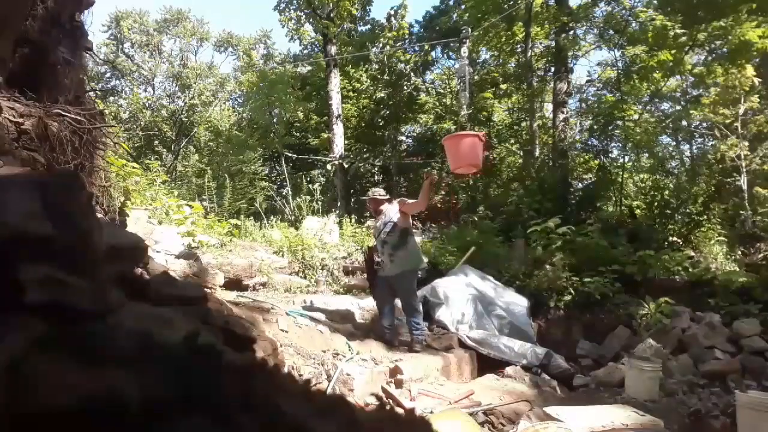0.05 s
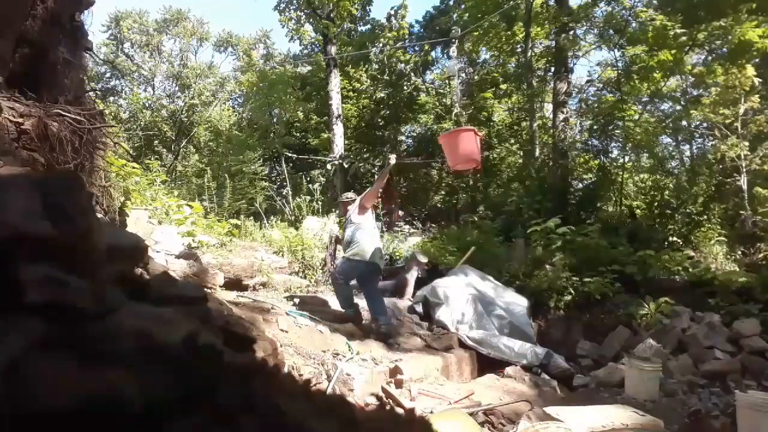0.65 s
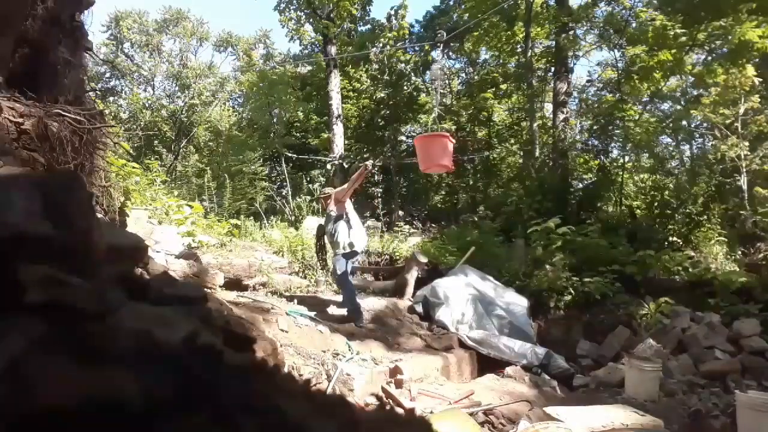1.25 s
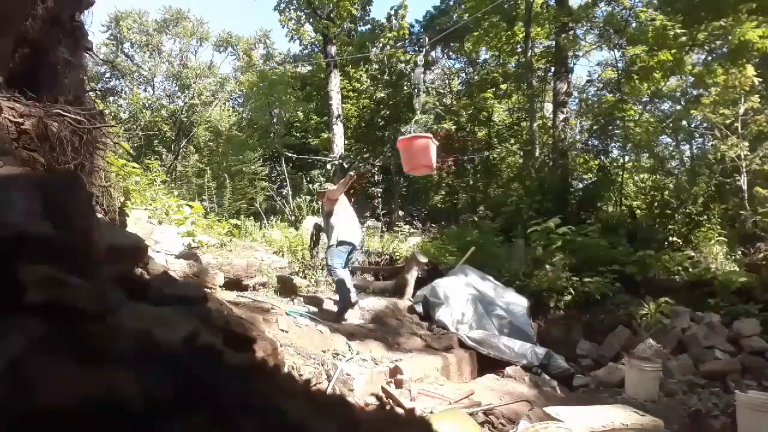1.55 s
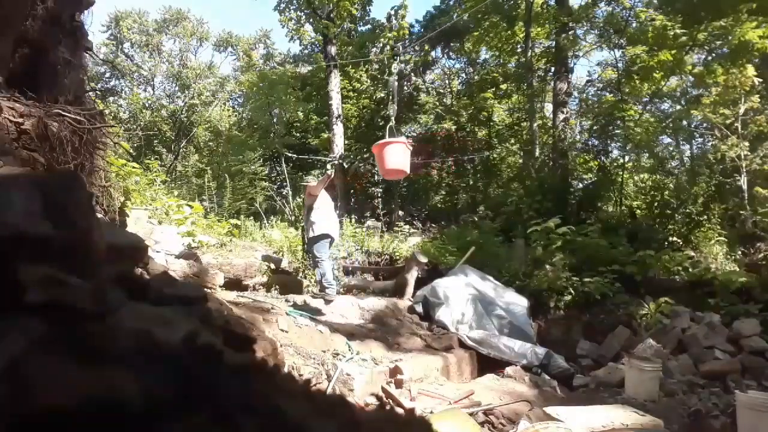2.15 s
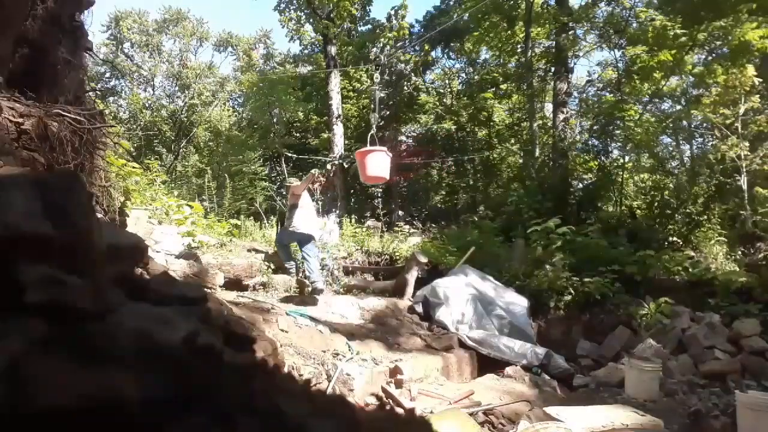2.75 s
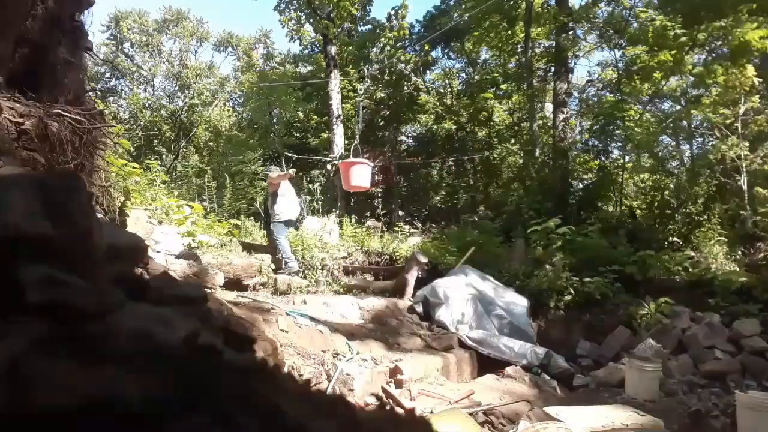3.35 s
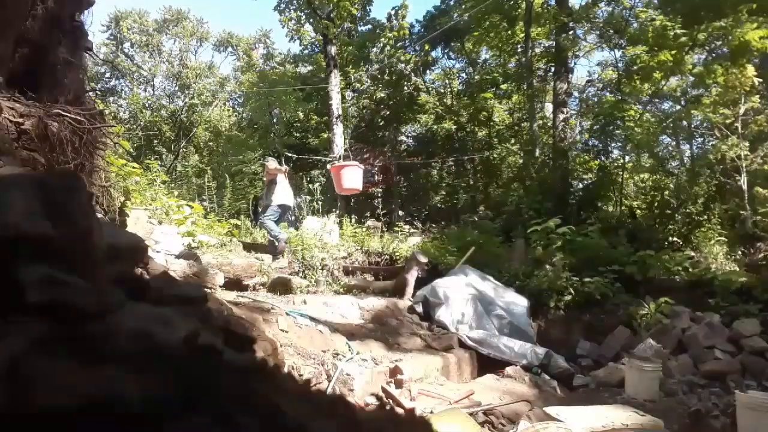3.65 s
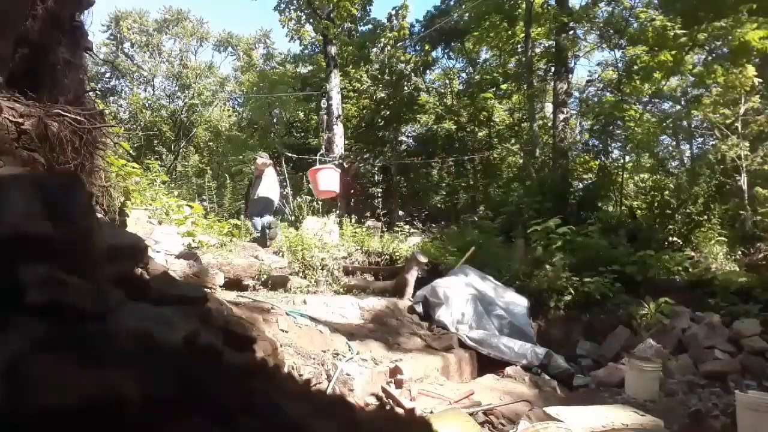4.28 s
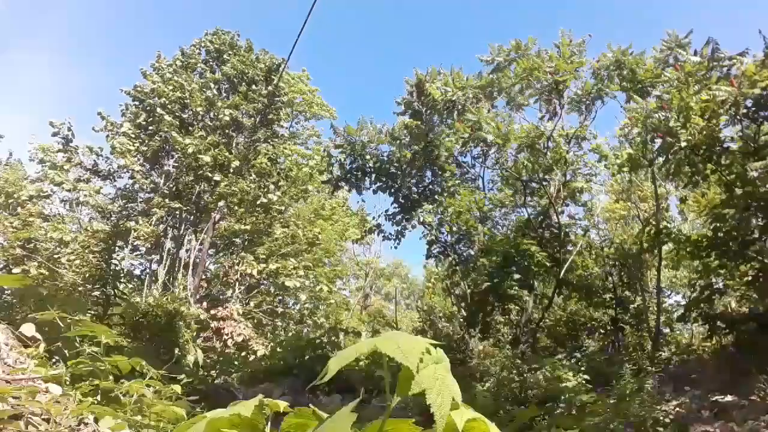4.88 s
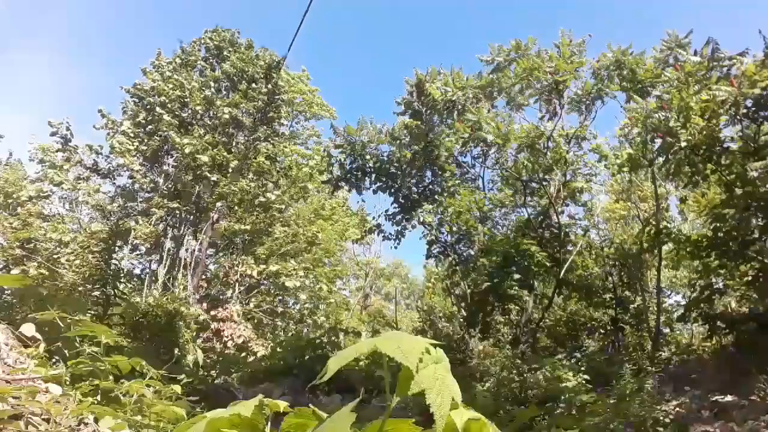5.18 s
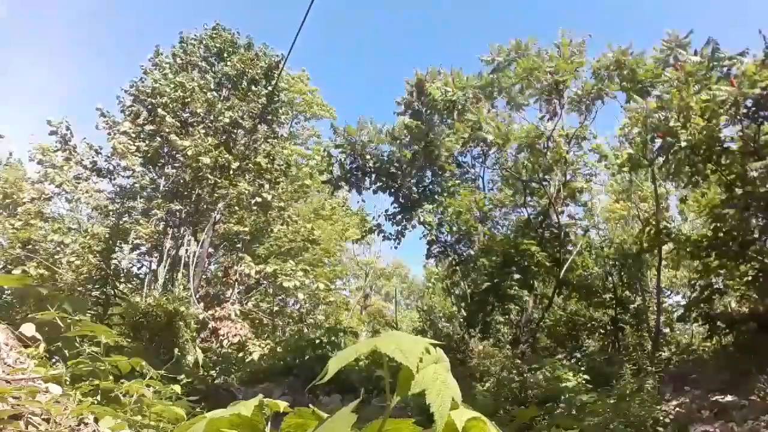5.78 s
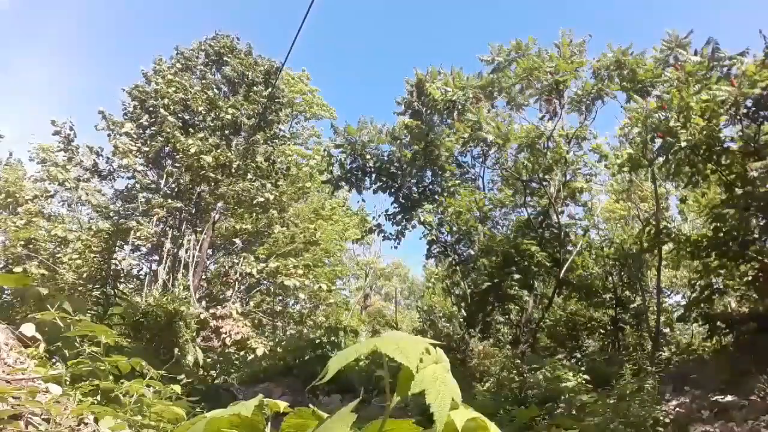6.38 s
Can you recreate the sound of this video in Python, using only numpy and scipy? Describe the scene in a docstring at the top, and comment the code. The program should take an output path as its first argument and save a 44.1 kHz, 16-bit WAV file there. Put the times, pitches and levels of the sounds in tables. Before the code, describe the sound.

In a wooded yard, a chain clinks and jingles unevenly some way off as a hanging bucket is tugged along a line, with soft boot steps on grit and a faint insect buzz. Then, close to the microphone, a pulley squeals briefly and the chain runs through it in one loud rattling rush that rings out. A small bird chirps three times over faint leaf hiss and distant rumble.

```python
"""Hauling a rubble bucket along an overhead line

In a wooded yard each tug shakes the bucket's chain into clinks, as links collide and ring. Boots thud
on loose ground and an insect buzzes faintly. Then, heard from close under the line, the chain bites on
a pulley that squeals by stick-slip friction, runs free in one loud rattling rush and rings out.
A small bird calls in the quiet afterwards, over distant rumble and the hiss of leaves."""
import sys
import numpy as np
from scipy import signal
from scipy.fft import rfft, irfft
from scipy.io import wavfile
from scipy.ndimage import uniform_filter1d

SR = 44100
rng = np.random.default_rng(int(sys.argv[2]) if len(sys.argv) > 2 else 0)


def waveform_to_disk(signal):
    """Save audio, clipped to [-1, 1], as 16-bit WAV at the path in sys.argv[1]."""
    frames = np.transpose(np.atleast_2d(signal))
    scaled = np.clip(frames, -1, 1) * 32767
    samples = np.round(scaled).astype(np.int16)
    wavfile.write(sys.argv[1], SR, samples)


N = 287525
TIME = np.arange(N) / SR
BINS = np.fft.rfftfreq(4096, 1 / SR)
BITE_S, FREE_S, STOP_S = 4.817, 5.005, 5.4993  # the chain bites on the pulley, comes free and stops

# Broad spectrum of a clink. Each row: frequency in Hz, relative level in dB.
CLINK_SPECTRUM = [(100, -33.5), (500, -14.5), (1200, -17.5), (1750, -7), (2400, -2.5), (2950, -10.5),
                  (3700, -7.5), (5300, -12.5), (7000, 2), (8200, -3.5), (8900, -10), (11000, -8.5),
                  (13000, -4.5), (15800, -3)]
# Resonances of the links. Each row: frequency in Hz, width in Hz, lift in dB.
LINK_MODES = [(1924, 360, 10.75), (2350, 280, 4.5), (3810, 97, 5.4), (4130, 750, 8.5), (4750, 230, 8.9),
              (5970, 260, 7.8), (7220, 340, 4.4)]
# Stereo width of the hauled chain and boots. Each row: frequency in Hz, left-right coherence.
FAR_COHERENCE = [(100, 0.98), (500, 0.91), (2000, 0.38), (4000, 0.33), (6500, 0.061), (16000, 0)]
# Their direction. Each row: frequency in Hz, left minus right level in dB.
FAR_BALANCE = [(60, 2), (200, -1), (400, -2.5), (1300, -6), (2300, -2), (4400, -8), (7200, -3),
               (10500, -10), (15000, -1.5)]


def amp(db):
    """Amplitude ratio of a level in decibels."""
    return 10 ** (np.asarray(db) / 20)


def unit(x):
    """Normalisation to an rms of 1."""
    return x / np.sqrt(np.mean(x ** 2) + 1e-20)


def wander(count, window):
    """A moving average turns white noise into a slow fluctuation of rms 1."""
    return unit(uniform_filter1d(rng.standard_normal(count), size=window))


def read(points, hz=BINS):
    """Interpolation of a spectrum on a logarithmic frequency axis."""
    f, value = np.transpose(points)
    return np.interp(np.log(hz + 1), np.log(f + 1), value)


def add(mix, s, sound):
    """Superposition of a sound on the mix, starting at s seconds."""
    part = mix[:, max(round(s * SR), 0):][:, :sound.shape[-1]]
    part += sound[..., :part.shape[1]]


def humps(modes, pitch=1):
    """Lorentzian resonances add in power to lift a spectrum; the lift is in dB."""
    peaks = sum(abs(amp(db) ** 2 - 1) / (1 + (2 * (BINS - hz * pitch) / width) ** 2)
                for hz, width, db in modes)
    return 10 * np.log10(1 + peaks)


def resonances(modes):
    """Steep-sided resonances add in power; their joint gain is in dB."""
    power = sum(amp(db) ** 2 / (1 + ((BINS - hz) / width) ** 2) ** 2 for hz, width, db in modes)
    return 10 * np.log10(power)


def treble(hz, corner_hz=8600):
    """A steep crossover: the share of each frequency that belongs to a contact's bright edge."""
    return 1 / (1 + (corner_hz / (hz + 1)) ** 16)


def colour(x, db):
    """A minimum-phase filter of unit energy is causal, so resonances ring after each contact."""
    log_gain = np.log(amp(np.r_[db, db[-2:0:-1]]))
    taps = irfft(np.exp(np.conj(signal.hilbert(log_gain)))[:len(db)])
    return signal.fftconvolve(x, taps[None] / np.linalg.norm(taps), axes=1)[:, :x.shape[1]]


def swell(start, stop, rise_s, fall_db_per_s):
    """A driven vibration builds from start, holds, and decays exponentially after stop."""
    rise = 1 - np.exp(-np.maximum(TIME - start, 0) / rise_s)
    return rise * amp(-fall_db_per_s * np.maximum(TIME - stop, 0))


def place(pair, coherence, balance):
    """Coherence between the ears sets a sound's width, and level difference its direction."""
    hz = np.fft.rfftfreq(N, 1 / SR)
    left, other = rfft(pair)
    shared = np.clip(read(coherence, hz), -1, 1)
    right = shared * left + np.sqrt(1 - shared ** 2) * other
    tilt_db = read(balance, hz) / 2
    return irfft(np.array([left * amp(tilt_db), right * amp(-tilt_db)]), N)


def yard(x, wet_db):
    """Scattering from trunks, leaves and rock: sparse echoes, each band decaying at its own rate."""
    # Each row: frequency in Hz, reverberation time in seconds.
    decay_times = [(100, 0.52), (1000, 0.23), (2000, 0.2), (7000, 0.376), (15000, 0.25)]
    echoes = rng.standard_normal((2, SR)) * (rng.random((2, SR)) < .06)
    hz, t, bands = signal.stft(echoes, SR, nperseg=256)
    envelope = amp(-60 * t / read(decay_times, hz)[:, None]) * (1 - np.exp(-t / .008))
    tail = signal.istft(bands * envelope, SR, nperseg=256)[1]
    return x + amp(wet_db) * signal.fftconvolve(x, tail / np.linalg.norm(tail[0]), axes=1)[:, :N]


def air(spectrum, gain, balance, sway_db=1.27):
    """A diffuse field of swaying noise, alike at both ears only at long wavelengths."""
    # Each row: frequency in Hz, left-right coherence.
    coherence = [(60, 1), (150, 0.86), (400, 0.56), (1000, .1), (4000, 0)]
    sway = unit(sum(np.sin(2 * np.pi * (hz * TIME + rng.random())) / np.sqrt(hz)
                    for hz in np.geomspace(.5, 12, 20)))
    wash = colour(rng.standard_normal((2, N)), read(spectrum))
    return place(wash * gain * amp(sway_db * sway), coherence, balance)


def outdoors(change_s=4.615, pit_db=-56.5, tree_db=-65, breeze_db=3.5, calming_s=1.9):
    """Ambient rumble and leaf hiss: the scene changes from the pit to trees whose leaves calm down."""
    # Air at the two spots. Each row: frequency in Hz, relative level in dB.
    pit_spectrum = [(25, -43.5), (38, -26.5), (56, 4), (80, -7), (108, 2.5), (200, -14), (270, -12),
                    (545, -8.5), (1070, -9.5), (2910, -8), (4490, -11.5), (7300, -10.5), (8700, -26),
                    (15500, -25)]
    tree_spectrum = [(25, -43.5), (55, -29.5), (120, -16.5), (360, -16.5), (900, -16), (1300, -15.5),
                     (2000, -12), (3300, -6.5), (4500, -10.5), (7300, -12.5), (9000, -28.5), (15000, -21.5)]
    # Each row: frequency in Hz, left minus right level in dB.
    pit_balance = [(150, -0.5), (700, -4.5), (4400, -4.0), (8000, -3.0), (15000, -10)]
    tree_balance = [(100, -3.5), (2400, 0.5), (8000, 4.5), (15000, -10.0)]
    changed = np.clip((TIME - change_s) / .01, 0, 1)
    breeze = breeze_db * np.clip(1 - (TIME - change_s) / calming_s, 0, 1)
    pit = air(pit_spectrum, amp(pit_db) * (1 - changed), pit_balance)
    return pit + air(tree_spectrum, amp(tree_db + breeze) * changed, tree_balance)


def ping(hz, db, t60, split=0.03, rise_s=0.00052):
    """Mode splitting: a link is nearly round, so it rings as a close, beating pair of modes."""
    t = np.arange(SR // 4) / SR
    phase = 2 * np.pi * rng.random((2, 2, 1))
    lower = np.sin(2 * np.pi * hz * t + phase[0] / 3)
    upper = np.sin(2 * np.pi * hz * (1 + split) * t + phase[1])
    return amp(db - 60 * t / t60) * (1 - np.exp(-t / rise_s)) * (lower + .5 * upper)


def clink(db, low_db, treble_db, low_hz, high_hz, crack_s=0.0023, clatter_s=0.0066):
    """Impact excites modes: a crack, a clatter of neighbours, and the struck link's two pitches."""
    t = np.arange(4096) / SR
    crack = amp(db - 6) * np.exp(-t / crack_s) * (1 - np.exp(-t / 0.00042))
    rebounds = amp(3.1 * wander(len(t), 70))
    clatter = amp(db - 4) * np.exp(-t / clatter_s) * (1 - np.exp(-t / 0.0017)) * rebounds
    own_modes = [(hz, 50, 10) for hz in rng.uniform(3400, 14000, 8)]  # no two links ring alike
    detune = 1 + 0.02 * rng.standard_normal()
    spectrum = read(CLINK_SPECTRUM) + humps(LINK_MODES, detune) + humps(own_modes)
    spectrum += (treble_db + 14) * treble(BINS)
    spectrum += (low_db + 9) * (1 - treble(BINS, corner_hz=3220))
    ring = ping(low_hz, db + low_db - 11, t60=0.19) + ping(high_hz, db - 15, t60=0.056)
    burst = np.hypot(crack, clatter) * rng.standard_normal((2, len(t)))
    return colour(burst, spectrum) + ring[:, :len(t)]


def insect(buzz_hz=6330, half_width_hz=260):
    """Narrow-band noise is heard as a faint buzz, swelling and fading among the leaves."""
    # Each row: middle in seconds, length in seconds, level in dB.
    buzzes = [(0.115, .14, -67), (0.613, 0.14, -65), (1.306, 0.15, -61)]
    swells = sum(amp(db) * np.exp(-(2 * (TIME - s) / length) ** 2) for s, length, db in buzzes)
    return swells * colour(rng.standard_normal((2, N)), resonances([(buzz_hz, half_width_hz, 0)]))


def contacts(per_s, spread_db, ring_s):
    """Shot noise: random collisions of uneven size, each a short decaying burst; rms 1."""
    struck = rng.random(N) < per_s / SR
    energy = amp(spread_db * np.minimum(rng.exponential(1, N), 3)) ** 2
    power = signal.lfilter([1], [1, -np.exp(-1 / (ring_s * SR))], struck * energy) + 1e-9
    power /= abs(uniform_filter1d(power, size=1800)) + 0.12 * power.mean()  # evens out slow changes
    return unit(np.sqrt(power) * rng.standard_normal((2, N)))


def jingle(per_s=1.6, spread_db=3, detune=.055, tilt_db_per_octave=2, links=28):
    """Free vibration of single links, each tapped at random and ringing at its own pitch."""
    out = np.zeros((2, N))
    for k in range(links):
        hz = LINK_MODES[k % len(LINK_MODES)][0] * (1 + detune * rng.standard_normal())
        link = ping(hz, tilt_db_per_octave * np.log2(hz / 6000), t60=.06 * np.sqrt(1000 / hz))
        gaps, sizes = rng.exponential(1, (2, 24))
        for s, size in zip(np.cumsum(gaps) / per_s, sizes):
            add(out, s, link * amp(spread_db * min(size, 2)))
    return out


def hauled_chain(pitch_scatter=0.033):
    """Each tug drives the links into collision; they jostle while it lasts, then damping settles them."""
    # The loudest impacts. Each row: start in seconds, relative levels in dB of the whole clink,
    # its low ring and its treble, pitch of the struck link in Hz.
    clinks = [(0.0502, -37, -5, -19, 3780), (0.6532, -39.5, -8, -18, 3900), (0.7136, -26.5, -4, -31, 3580),
              (0.7379, -23, -6, -24, 3800), (0.7687, -18, -8, -15.5, 4700), (0.8104, -23, -3, -20, 6160),
              (0.8585, -32.5, -10, -27, 4800), (0.9892, -24.5, -13, -13.5, 7000),
              (1.3466, -26, -8.5, -16.5, 4140), (1.4146, -22.5, -23, -23, 6730),
              (1.4327, -23, -10, -24, 7380), (1.4751, -26.5, -15, -15, 7100),
              (1.5111, -21.5, -10, -17, 4100), (1.558, -24.5, -8.5, -15, 3950),
              (1.6183, -25.5, -10.5, -10, 4330), (1.6472, -26.5, -9, -19, 7050),
              (1.8407, -34, -23, -14, 7300), (1.873, -34, -12.5, -40, 4170),
              (1.9804, -29, -10.5, -20, 7430), (2.0324, -36, -23, -9, 6850), (2.0707, -25.5, -3, -20, 4320),
              (2.1034, -22, -8.5, -20, 7070), (2.176, -22, -11.5, -15.5, 7700),
              (2.1948, -22, -9, -19, 7320), (2.269, -23, -14.5, -13, 6860), (2.2993, -18.5, -16, -15, 3880),
              (2.3915, -22, -9.5, -17.5, 7280), (2.5207, -21.5, -18, -17, 7280),
              (2.5614, -28.5, -12, -11, 7310), (2.6329, -27.5, -11.5, -14, 6730),
              (2.7776, -22, -15.5, -17, 7300), (2.7934, -24, -12, -18, 7300),
              (2.8751, -25.5, -11, -22, 7640), (2.9516, -22, -16.5, -18, 4120),
              (3.0068, -23, -11, -24, 4030), (3.0695, -24.5, -11.5, -25, 4080),
              (3.0885, -22, -9.5, -19, 6000), (3.1171, -22, -26, -16, 3770), (3.1982, -24, -9.5, -17, 3690),
              (3.4025, -31, -17, -18, 7400), (3.454, -22.5, -15, -10, 4120), (3.5162, -29, -18, -22, 4070),
              (3.5757, -21.5, -12.5, -31, 7120), (3.703, -20.5, -13, -17.5, 4790),
              (3.7502, -24, -29, -18, 7010), (3.8764, -30.5, -8.5, -14, 4320),
              (3.9943, -39.5, -8, -24, 6140), (4.0964, -30.5, -12, -18, 7070), (4.15, -29, -12, -10, 4520),
              (4.186, -27, -17, -14, 3700), (4.3076, -22.5, -16, -20, 4490), (4.3904, -25, -19, -16, 6900),
              (4.4502, -31, -35, -17, 6790), (6.4557, -43.5, -27, -16, 7700),
              (6.5045, -31.5, -51, -21, 7230)]
    # Links that swing free and ring on. Each row: start in seconds, pitch in Hz, level in dB.
    free_links = [(0.053, 1944, -42), (1.475, 6960, -26), (2.031, 11650, -28), (2.52, 1972, -34),
                  (2.634, 6480, -30.5), (2.877, 1770, -37), (3.006, 1980, -34.5), (3.199, 2008, -32),
                  (4.077, 7050, -37), (4.186, 3725, -30)]
    # Each row: start in seconds, length in seconds, relative jostling level in dB, low ring in Hz.
    tugs = [(0.762, 0.073, -37, 2366), (0.98, 0.012, -70, 2160), (1.40, 0.18, -42.5, 2277),
            (1.92, 0.43, -45, 1910), (2.53, .17, -47, 1954), (2.866, .36, -44.5, 1994),
            (3.482, 0.25, -38, 1947), (4.149, .18, -39.5, 1990), (4.44, 0.077, -50, 2000)]
    out = np.zeros((2, N))
    tug_s, tug_length, _, tug_hz = np.transpose(tugs)
    for s, db, low_db, treble_db, high_hz in clinks:
        low_hz = np.interp(s, tug_s + tug_length / 2, tug_hz)
        low_hz *= 1 + pitch_scatter * rng.standard_normal()
        add(out, s, clink(db, low_db, treble_db, low_hz, high_hz))
    for s, hz, db in free_links:
        add(out, s, ping(hz, db, t60=0.096 * (1000 / hz) ** 0.37))  # higher rings die sooner
    collisions = contacts(per_s=140, spread_db=2.0, ring_s=0.0037)
    jostle = colour(collisions, read(CLINK_SPECTRUM) + humps(LINK_MODES)) + amp(2) * jingle()
    shaking = sum(amp(db - 2) * swell(s, s + length, rise_s=0.029, fall_db_per_s=109)
                  for s, length, db, _ in tugs)
    return place(yard(out + jostle * shaking, wet_db=-6.5), FAR_COHERENCE, FAR_BALANCE)


def footsteps(knock_db=9, knock_width_hz=45):
    """Impact and friction: a boot lands with a hollow knock and grinds on the grit."""
    # Each row: start in seconds, level in dB, length in seconds, scuff over thud in dB, knock in Hz.
    footfalls = [(0.821, -49.5, 0.069, -1.5, 230), (1.384, -53, 0.08, 15.5, 268),
                 (1.939, -50, 0.059, -5.5, 270), (2.394, -44, 0.038, 2.5, 267),
                 (2.909, -53, 0.092, -23, 108), (3.463, -52, 0.045, -4.5, 101),
                 (4.302, -62.5, 0.13, 5, 108)]
    # Spectra of sole and grit. Each row: frequency in Hz, relative level in dB.
    thud_spectrum = [(40, -31.5), (100, 7), (170, -6), (300, 0.5), (600, -12.5), (1500, -19), (5000, -17)]
    scuff_spectrum = [(100, -27), (400, -16), (800, -3), (1400, 0), (1900, -10), (4000, -13), (9000, -20),
                      (16000, -39)]
    out, t = np.zeros((2, N)), np.arange(SR // 3) / SR
    for s, db, length, scuff_db, hz in footfalls:
        age = 3 * t / length
        pressure = age * np.exp((1 - age ** 2) / 2) * amp(4.1 * wander(len(t), 150))
        sole, grit = pressure * rng.standard_normal((2, 2, len(t)))
        knock = humps([(hz, knock_width_hz, knock_db), (1.64 * hz, knock_width_hz, 0.71 * knock_db)])
        thud = colour(sole, read(thud_spectrum) + knock)
        scuff = amp(scuff_db) * colour(grit, read(scuff_spectrum))
        add(out, s, amp(db) * (thud + scuff))
    return place(yard(out, wet_db=-11), FAR_COHERENCE, FAR_BALANCE)


def drive(bite_db, free_db, fall_db_per_s, steepness=1, sag_db_per_s=2.5):
    """Forced vibration of the rig builds as the chain bites, eases as it runs free, then decays."""
    biting = swell(BITE_S, FREE_S, rise_s=0.064, fall_db_per_s=402.5) ** steepness
    free = swell(FREE_S, STOP_S, 0.019, fall_db_per_s) * amp(-sag_db_per_s * (TIME - FREE_S))
    return np.hypot(amp(bite_db) * biting, amp(free_db) * free)


def running_chain():
    """Dense impacts of links on the pulley merge into a rattle, shake the rig and ring the block."""
    # Spectra of the rattle and the shaking rig. Each row: frequency in Hz, relative level in dB.
    rattle_spectrum = [(60, -79), (300, -41), (1200, -23.5), (1800, -15.5), (2400, -9), (2800, -8.5),
                       (3600, -5), (4700, -5), (6400, -2), (7700, -1.5), (8900, -13.5), (10000, -15.5),
                       (12100, -7), (13600, -9), (15700, -9.5)]
    shake_spectrum = [(30, -57), (55, -28.5), (85, -9.5), (130, -7.5), (250, -4), (400, -5.5), (700, -1.5),
                      (1000, 1), (1200, 10), (1450, -20.5), (1750, 2.5), (3000, -16.5)]
    # Resonances of rig and pulley block. Each row: frequency in Hz, width in Hz, strength in dB.
    rig_modes = [(2100, 120, 6), (2430, 110, 6.5), (3340, 32.4, 2), (5440, 130, 3.5), (5760, 50, 9),
                 (6390, 91, 8.5), (7340, 40, 7), (6806, 121.6, 12.5), (8230, 110, 7), (11270, 61.4, 7.5),
                 (11500, 60, 6.5), (12540, 110, 4), (14450, 250, -7)]
    block_modes = [(1730, 66, -9), (1880, 30, -6), (1986, 20, 3), (2417, 74, -3), (3345, 30, 0),
                   (3670, 70, -6.5), (4030, 120, -5), (4340, 89, -1.5), (5430, 34, 0), (6610, 200, -1),
                   (6600, 41, 1), (7150, 82, -29)]
    # Each row: frequency in Hz, left-right coherence.
    coherence = [(100, .4), (500, 0.35), (1200, -0.076), (2200, -0.23), (6000, 0.079), (15000, -0.29)]
    # Each row: frequency in Hz, left minus right level in dB.
    balance = [(100, -5), (200, -4), (400, -4), (1300, -3), (2000, 1), (3600, -3), (6400, 3), (8100, -4.5),
               (11300, -10), (13600, -2.5), (15500, -3)]
    blows, grazes = (contacts(per_s=2500, spread_db=1.85, ring_s=.0012) for _ in range(2))
    knocks = contacts(per_s=90, spread_db=5.0, ring_s=.004)
    spectrum = read(rattle_spectrum) + humps(rig_modes)
    bright = treble(np.fft.rfftfreq(N, 1 / SR), corner_hz=9200)
    rattle = irfft(rfft(colour(blows, spectrum)) * np.sqrt(1 - bright), N)
    fizz = irfft(rfft(colour(grazes, spectrum)) * np.sqrt(bright), N)
    shake = colour(blows, read(shake_spectrum))
    block = colour(blows, resonances(block_modes))
    low_ring = colour(knocks, resonances([(2015, 58, 0)]))  # a few heavy links keep a low mode going
    out = rattle * drive(bite_db=-18.5, free_db=-14, fall_db_per_s=124)
    out += fizz * drive(bite_db=-20.5, free_db=-13, fall_db_per_s=223)
    out += shake * drive(bite_db=-56.5, free_db=-39.5, fall_db_per_s=270)
    out += block * drive(bite_db=-20, free_db=-26.5, fall_db_per_s=82, steepness=1.5)
    out += low_ring * drive(bite_db=-15, free_db=-36.5, fall_db_per_s=65, steepness=16)
    return place(yard(out, wet_db=-14), coherence, balance)


def pulley_squeal(hz=2580, hold_s=0.11, waver=0.0094, sharpening=0.022, fall_db_per_s=140):
    """Stick-slip friction as the pulley starts to turn; once it spins, a faint, sharper tone remains."""
    # Each row: harmonic number, relative level in dB.
    harmonics = [(1, -4), (2, 1.5), (3, -5), (4, -18.5)]
    drift, flutter = wander(N, 200), wander(N, 200)
    grip = swell(BITE_S, BITE_S + hold_s, .008, fall_db_per_s)
    spin = swell(FREE_S, STOP_S, 0.069, fall_db_per_s)
    cycles = np.cumsum(hz * (1 + sharpening * spin + waver * drift)) / SR
    tone = sum(amp(db) * np.sin(2 * np.pi * k * cycles) for k, db in harmonics)
    envelope = (amp(-30) * grip + amp(-49) * spin) * amp(0.5 * flutter)
    pan = amp([[-2], [3]])
    return yard(tone * envelope * pan, wet_db=-6)


def bird(slide=0.56):
    """Frequency glides: three thin whistles slide down and level off, scattered by the trees."""
    # Each row: start in seconds, length in seconds, first pitch in Hz, target pitch in Hz, level in dB.
    chirps = [(6.119, 0.031, 4660, 3400, -52), (6.237, 0.09, 4980, 2900, -48),
              (6.39, 0.06, 5310, 2930, -46.5)]
    out = np.zeros((2, N))
    for s, length, start_hz, target_hz, db in chirps:
        progress = np.linspace(0, 1, round(length * SR))
        hz = target_hz + (start_hz - target_hz) * np.exp(-(progress / slide) ** 1.8)
        envelope = abs(np.sin(np.pi * progress)) ** 0.95 * (1 - progress / 2)
        add(out, s, amp(db) * envelope * np.sin(2 * np.pi * np.cumsum(hz) / SR))
    return yard(out, wet_db=-5)


def scene():
    """Superposition of outdoor air, chain, boots, pulley, bird and insect."""
    return (outdoors() + hauled_chain() + footsteps() + running_chain()
            + pulley_squeal() + bird() + insect())


def record(dry, cutoff_hz=15850):
    """Band limiting: a steep low-pass filter removes the highest treble."""
    lowpass = signal.firwin(511, cutoff_hz, window=("kaiser", 9), fs=SR)
    return signal.oaconvolve(dry, lowpass[None], "same")


dry = scene()
out = record(dry)
waveform_to_disk(out)
```